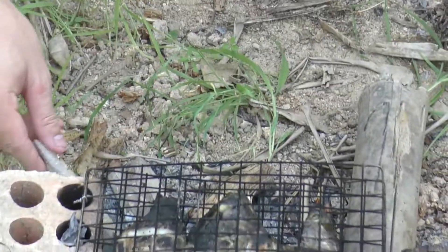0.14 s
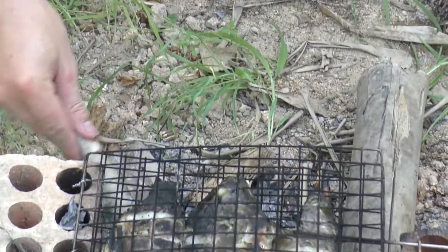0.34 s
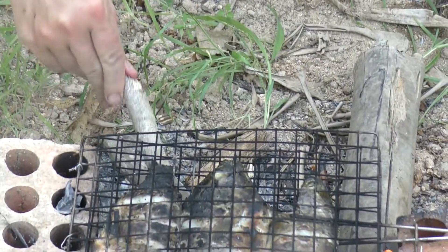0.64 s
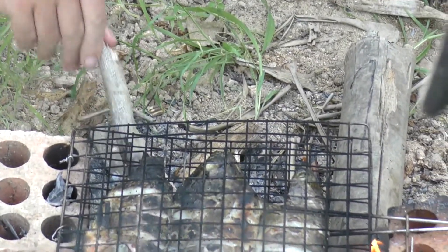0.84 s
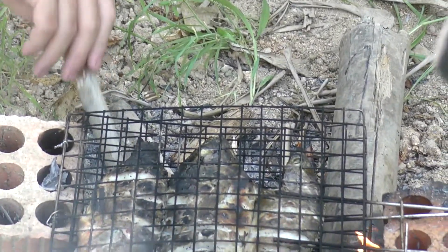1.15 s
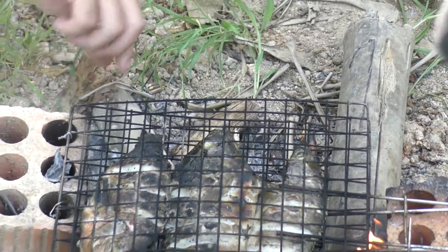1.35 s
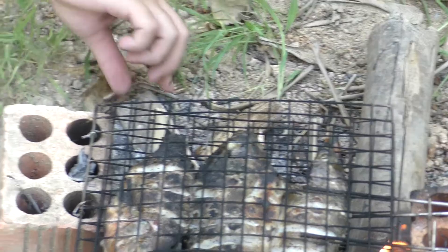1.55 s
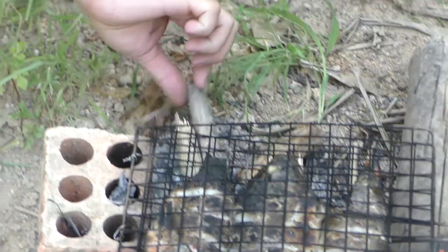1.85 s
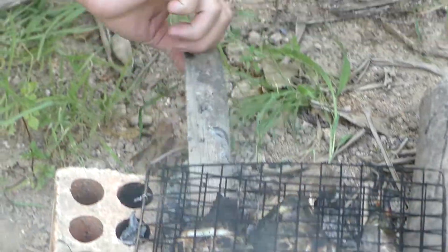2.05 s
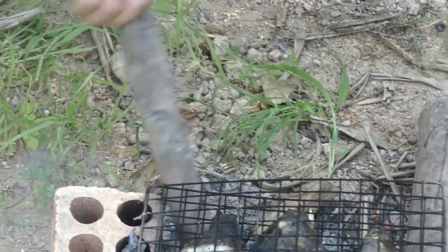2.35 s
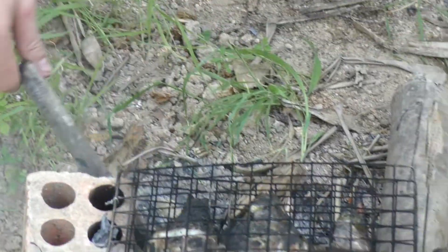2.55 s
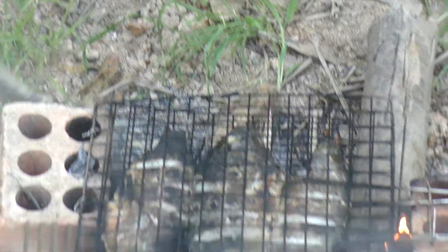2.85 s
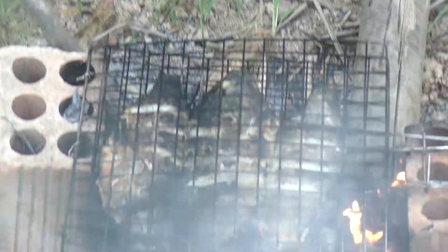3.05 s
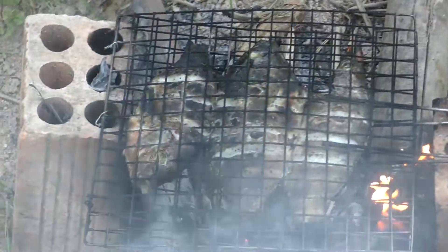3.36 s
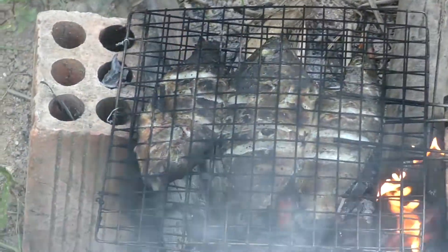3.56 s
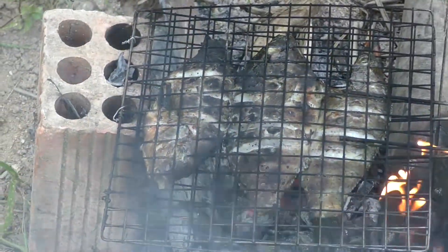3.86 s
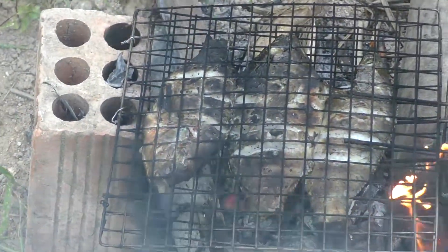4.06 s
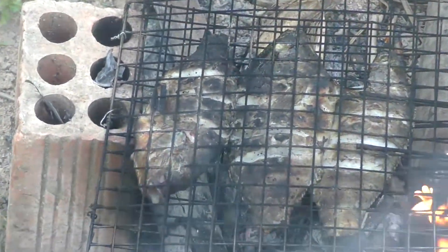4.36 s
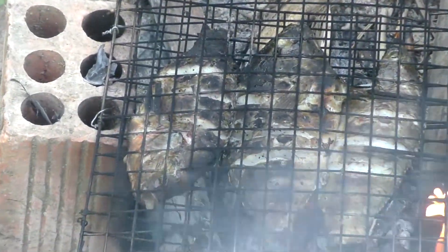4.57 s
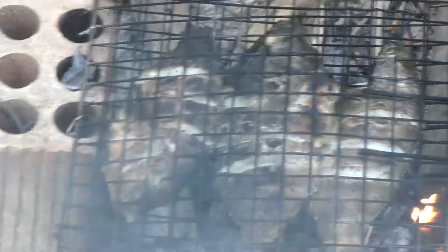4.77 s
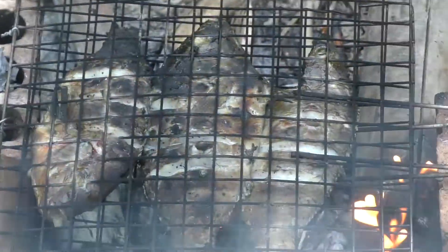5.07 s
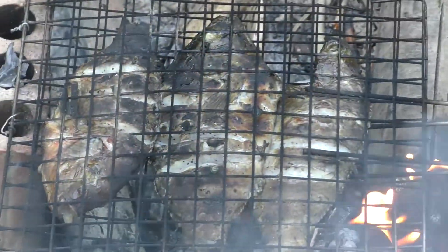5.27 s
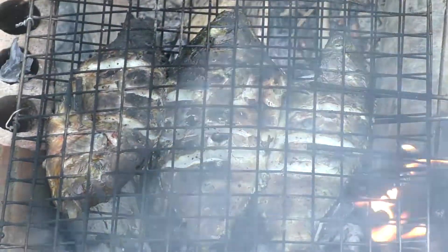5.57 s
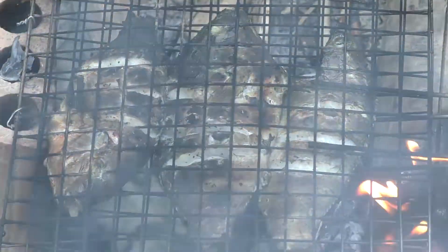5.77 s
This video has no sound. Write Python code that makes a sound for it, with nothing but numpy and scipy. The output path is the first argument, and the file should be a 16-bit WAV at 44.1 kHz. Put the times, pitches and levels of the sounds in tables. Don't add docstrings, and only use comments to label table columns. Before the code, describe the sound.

Outdoors beside a small wood fire, a near cicada buzzes shrilly, then stops at about two and a half seconds, uncovering another throbbing in quick phrases and a distant insect hiss. Sticks knock loudly, crackle and scrape through ash; the wire grill creaks faintly. Soft flames and a low far engine lie behind. Close stereo pair, turning toward the fire around two seconds.

```python
import sys
import numpy as np
from scipy import signal
from scipy.fft import rfft, irfft, next_fast_len
from scipy.io import wavfile
from scipy.ndimage import uniform_filter1d, map_coordinates

SR = 44100
rng = np.random.default_rng(int(sys.argv[2]) if len(sys.argv) > 2 else 0)


def to_linear_factor(level_db):
    exponent = np.asarray(level_db, float) / 20
    return 10 ** exponent


def wav_out(sig):
    wavfile.write(sys.argv[1], SR, np.round(np.clip(np.atleast_2d(sig).T, -1, 1) * 32767).astype(np.int16))


N = 260631
TIME = np.arange(N) / SR

# frequency in Hz, level in dB.
NEAR_BODY = [(3800, -26.5), (4400, -13.5), (4950, -11.5), (5150, -0.5), (5400, -1.5), (5790, -5),
             (6130, -0.5), (7350, -1.5), (7600, -2.5), (8100, -10.5), (8800, -12.5), (9200, -10.5),
             (12000, -21.5), (15700, -29)]
# frequency in Hz, width in Hz, level in dB.
NEAR_RINGS = [(5268, 30, 0), (5363, 30, 0), (5555, 35, 2), (5907, 40, 2), (6040, 35, 0), (6196, 35, 0),
              (6313, 35, 2), (6600, 60, 0), (6782, 45, 1), (6965, 35, 0), (7066, 35, 0), (7191, 35, 3),
              (7308, 40, 1), (7572, 30, 1), (7850, 40, 0), (7996, 25, 2), (8270, 35, 2), (8510, 45, 2),
              (8810, 50, 1)]
NEAR_DB, NEAR_TIRING_DB_PER_S, NEAR_BRIGHT_DB_PER_OCTAVE = -27, -0.48, 1
NEAR_STOP_S, NEAR_RELEASE_S = 2.555, 0.062

# frequency in Hz, width in Hz, level in dB.
THROB_BODY = [(4650, 250, -7.5), (5300, 300, -5), (5560, 300, -4), (5820, 230, 1.2), (6260, 200, -3.5),
              (6760, 260, -.5), (11300, 500, -12)]
FIRST_PHRASE_S, PHRASE_S, THROB_S, THROBS_PER_PHRASE = 0.1645, 0.3268, 0.0361, 7.4

# frequency in Hz, level in dB.
CHORUS_COLOUR = [(2500, -58), (3600, -18), (4900, -10), (5700, 1), (6220, 0.5), (6750, -4), (7300, -2.5),
                 (8660, -19), (9570, -20), (10300, -19), (11500, -18.5), (12300, -24.5), (13400, -32.5),
                 (15700, -44)]
# frequency in Hz, width in Hz, level in dB.
FAR_RINGS = [(8200, 120, -6), (9150, 150, -3), (10000, 120, -3), (10580, 250, 0), (11320, 150, 0),
             (11700, 150, 0), (12150, 150, -2), (12690, 120, -2)]
CHORUS_DB = -38

# time in seconds, peak in dB, own ring in Hz, share of the pile in dB.
CRACKS = [(1.0344, -19, 1377, -18), (1.3714, -19.5, 2340, -18), (2.162, -26, 2420, -8),
          (2.1872, -24, 1460, -2.5), (2.5264, -27.5, 1170, -10.5), (2.8098, -15.5, 1310, -2.5),
          (3.037, -24, 1720, -13), (3.1717, -27, 1030, -10.5), (3.2875, -17, 2800, -5),
          (3.3045, -12, 2050, -4.5), (3.3167, -17, 1400, -15), (3.7866, -19.5, 3000, -9.5),
          (3.897, -23.5, 1370, -1), (4.1923, -23.5, 2800, -5.5), (4.239, -19.5, 2210, 0.5),
          (4.2742, -23.5, 2970, -7), (4.332, -21, 2110, -9), (4.3413, -25, 2630, -4),
          (4.377, -32.5, 3040, 3), (5.6105, -20.5, 2290, -18), (5.662, -28, 2800, -5)]
# time in seconds, peak in dB, own ring in
# Hz.
FAINT_CRACKS = [(0.7735, -34.5, 2250), (0.8182, -30, 2250), (1.082, -31, 1500), (1.7347, -44, 2620),
                (1.99, -31, 1120), (2.038, -43, 3080), (2.1425, -29, 2370), (2.2256, -28, 1240),
                (2.6317, -29.5, 2000), (2.6972, -33, 1000), (2.8648, -28, 1310), (2.8962, -38, 2150),
                (3.218, -29, 2870), (3.407, -39, 1020), (3.44, -33, 1340), (3.496, -30, 2000),
                (3.7079, -32.5, 3100), (4.0597, -31, 1060), (4.1568, -27, 2720), (4.1757, -29, 1220),
                (4.9844, -38, 2650), (5.0652, -29, 1700), (5.2705, -32, 1240)]
# frequency in Hz, width in Hz, level in dB.
WOOD_PILE = [(326, 81, 1), (714, 280, -1), (1300, 110, 3.5), (1720, 220, 0.5), (2250, 240, 2),
             (3080, 136, 4.5), (3930, 300, -12.5), (4460, 460, -13.5)]
CRACK_T60_S, FAINT_CRACK_WOOD_DB, SNAP_DB = 0.031, -6.5, -22.5

# time in seconds, peak in dB.
KNOCKS = [(1.7412, -1.5), (2.0646, -11), (2.802, -13.5), (3.8751, -2), (4.9596, -8.5)]
# frequency in Hz, width in Hz, level in dB.
STICKS = [
    [(755, 67, 2), (1300, 95, -0.5), (1623, 69, 3.5), (2200, 98, 4), (3000, 150, -1.5), (4470, 540, -20)],
    [(490, 450, -6), (1710, 190, 2), (2370, 190, -6), (3190, 180, 5), (3700, 160, -2), (4230, 220, -6)],
    [(715, 170, -10), (1330, 160, -8), (2290, 230, -13), (2650, 97, 9), (2860, 250, 2.5), (4560, 270, -18)],
    [(696, 60, -4.5), (1280, 78, 0.5), (1740, 220, -5), (2230, 106, 4), (3040, 210, -9.5),
     (3940, 420, -16.5)],
    [(700, 40, -6), (1240, 28, 4.5), (1710, 61, -5), (2250, 106, -2), (3190, 190, -6.5)],
]
# time in seconds, peak in dB, pitch in Hz.
THUDS = [(0.471, -33, 213), (1.086, -31, 174), (1.74, -26.5, 277), (2.065, -34, 151), (2.22, -23.5, 151),
         (2.529, -32, 500), (2.808, -29, 198), (2.91, -19.5, 217), (3.309, -24, 326), (3.874, -25.5, 350),
         (4.237, -34, 480), (4.964, -26.5, 374)]

# time in seconds, level in dB.
SCRAPE_LEVEL = [(0.0, -41), (1.15, -70), (1.79, -59), (1.96, -50.5), (3.41, -37), (3.64, -47), (4.13, -39.5),
                (4.54, -41.5), (5.91, -42)]
# start and length in seconds, centre in Hz, width in octaves, level in dB.
SWISHES = [(0.369, 0.18, 2820, 0.53, -39), (0.05, 0.12, 2510, 0.66, -50), (1.746, 0.097, 2600, 0.86, -44.5),
           (2.058, 0.079, 2500, 1.7, -37), (2.121, 0.16, 2200, 1.6, -40.5), (2.798, 0.1, 2300, 0.55, -39),
           (3.116, 0.079, 3300, 0.42, -46.5), (3.304, 0.06, 3470, 1.04, -29),
           (3.865, 0.12, 1770, 0.66, -44), (4.027, 0.075, 1800, 0.92, -44.5),
           (4.235, 0.086, 2500, 1.4, -38), (4.313, 0.14, 2600, 1.3, -42), (4.743, 0.061, 2000, .8, -44),
           (4.956, 0.16, 1520, 1.7, -42), (5.585, 0.13, 2490, 1.3, -38.5), (5.704, 0.19, 1820, 1.1, -40)]
# start and length in seconds, slips per second, level in dB.
CREAKS = [
    (3.795, .09, 68, -35.5),
    (5.357, .12, 68, -44),
    (5.53, .05, 68, -45),
    (5.585, .1, 60, -42),
    (3.205, .035, 60, -41),
]

# frequency in Hz, level in dB.
AIR_COLOUR = [(18, -34), (30, -19), (59, -6), (80, -6), (164, -7.5), (224, -10.5), (371, -12), (498, -12.5),
              (1230, -23), (3500, -31.5), (4050, -45), (4500, -31), (5850, -72), (9900, -120)]
AIR_DB, TURN_S, TURN_LASTS_S, TURN_GAIN_DB = -41, 2.12, 0.23, 4
# time in seconds, level in dB.
ENGINE_HUM = [(0.1, -46), (0.23, -41.5), (0.63, -49), (0.66, -53), (1.16, -36.5), (1.33, -53.5),
              (1.73, -39), (2.09, -50), (2.33, -37), (3.14, -34), (3.65, -32.5), (5.69, -42), (5.87, -40),
              (5.9, -37)]
# frequency in Hz, level in dB, start and end in seconds.
ENGINE_ORDERS = [
    (80.5, -41, -1, 4.1),
    (90.5, -38, 2.1, 7),
]
# frequency in Hz, width in Hz, level in dB.
RUMBLE_BODY = [(105.7, 8.9, 1), (120.4, 13.2, 0.5), (134.8, 4.1, -2), (214, 13.5, -7.5)]
RUMBLE_DB, RUMBLE_FOLLOWS = -41.5, 0.56

# frequency in Hz, left-right likeness from 0 to 1.
LIKENESS = [(60, 0.67), (150, 0.32), (380, 0.62), (950, 0.39), (2380, 0.63), (5980, 0.88), (15000, 1)]
# frequency in Hz, left over right in dB.
BALANCE = [(60, -11), (150, -5), (380, -4), (950, -1.0), (2380, -0.5), (5980, 1.5), (15000, -10.5)]


def unit(x):
    return x / np.sqrt(np.mean(x ** 2) + 1e-20)


def along(points, hz):
    f, v = np.transpose(points)
    return np.interp(np.log(hz + 1), np.log(f + 1), v)


def level_curve(rows):
    s, db = np.transpose(rows)
    return np.interp(TIME, s, db)


def wobble(rate):
    knots = rng.standard_normal(int(N * rate / SR) + 4)
    return map_coordinates(knots, [TIME * rate])


def filtered(x, response):
    m = next_fast_len(N + SR // 4)
    hz = np.fft.rfftfreq(m, 1 / SR)
    return irfft(rfft(x, m) * response(hz), m)[..., :N]


def modes(table):
    def response(f):
        total = 0
        for k, (hz, width, db) in enumerate(table):
            total = total + (-1) ** k * to_linear_factor(db) * 1j * f * width / (hz * hz - f * f + 1j * f * width)
        return total
    return response


def clicks(rate, jitter, scatter_db):
    count = np.floor(np.cumsum(rate * (1 + jitter * wobble(300)) / SR))
    return np.diff(count, prepend=0) * to_linear_factor(scatter_db * rng.standard_normal(N))


def rush(patchy_db):
    z = signal.stft(rng.standard_normal((2, N + 512)), nperseg=512)[2]
    patches = uniform_filter1d(rng.standard_normal(z.shape[1:]), size=6, axis=0)
    patches = uniform_filter1d(patches, size=12, axis=1)
    return signal.istft(z * to_linear_factor(patchy_db * unit(patches)), nperseg=512)[1][:, :N]


def foliage(x, t60, wet_db):
    t = np.arange(SR // 8) / SR
    tail = rng.standard_normal((2, 2, len(t))) * to_linear_factor(-60 * t / t60)
    tail = tail / np.linalg.norm(tail[0, 0])
    wet = signal.fftconvolve(x[None, None], tail, axes=2)[..., :N]
    sway = 1.22 * TIME
    scattered = np.cos(sway) * wet[0] + np.sin(sway) * wet[1]
    return to_linear_factor(wet_db) * scattered + x * np.array([[1], [0]])


def near_cicada():
    level_db = NEAR_DB + NEAR_TIRING_DB_PER_S * TIME
    bright_db = NEAR_BRIGHT_DB_PER_OCTAVE + 0.77 * wobble(8.9)
    buckles = clicks(312, jitter=0.25, scatter_db=4.5) + clicks(358, jitter=0.25, scatter_db=0)
    buckles += 0.13 * rng.standard_normal(N)
    rings = modes(NEAR_RINGS)
    buzz = filtered(buckles, lambda f: to_linear_factor(along(NEAR_BODY, f)) * (0.3 + np.abs(rings(f))))
    buzz = unit(foliage(buzz, t60=0.45, wet_db=-0.5))
    tilt = filtered(buzz, lambda f: np.log2((f + 1) / 6500) / 10.0)
    song = np.clip((NEAR_STOP_S - TIME) / NEAR_RELEASE_S, 0, 1)
    return song * to_linear_factor(level_db + 0.8 * wobble(18)) * (buzz + bright_db * tilt)


def throbbing_cicada():
    effort = np.zeros(N)
    for start in np.arange(FIRST_PHRASE_S, N / SR, PHRASE_S):
        throb = (TIME - start + 0.0071) / THROB_S
        swell = np.sin(np.pi * np.clip(throb % 1 / 0.72, 0, 1) ** 0.7)
        fill = 0.14 + 0.8 * np.clip(throb / THROBS_PER_PHRASE, 0, 1) ** 2
        phrase = (throb > 0) * np.clip((THROBS_PER_PHRASE - throb) / 1.2, 0, 1)
        effort += phrase * (fill + (1 - fill) * swell)
    groups = 1 + 0.35 * np.sin(2 * np.pi * 104 * TIME)
    ribs = clicks(420, jitter=0.03, scatter_db=1.2) * groups + 0.093 * rng.standard_normal(N)
    ring = unit(filtered(ribs, lambda f: modes(THROB_BODY)(f) ** 2))
    return to_linear_factor(-34) * foliage(effort * ring, t60=0.04, wet_db=-10)


def fire():
    own, blows, snaps = np.zeros((3, N + SR))
    t = np.arange(SR // 10) / SR
    events = CRACKS + [(*tick, FAINT_CRACK_WOOD_DB) for tick in FAINT_CRACKS]
    noise = rng.standard_normal((len(events), 3, len(t)))
    fade_db = -60 * t / CRACK_T60_S
    blow_fade = to_linear_factor(-60 * t / (0.17 * CRACK_T60_S)) + 0.12 * to_linear_factor(-60 * t / 0.11)
    for (s, db, hz, wood_db), (burst, snap, shake) in zip(events, noise):
        here = slice(round(s * SR), round(s * SR) + len(t))
        ring = np.sin(2 * np.pi * hz * t + 0.024 * np.cumsum(shake)) * (1 - np.exp(-t / 0.00047))
        own[here] += to_linear_factor(db - 6 + fade_db) * ring
        blows[here] += to_linear_factor(db + wood_db) * burst * blow_fade
        snaps[here] += to_linear_factor(db + SNAP_DB + fade_db) * snap
    snaps = filtered(snaps[:N], modes([(4800, 1200, 21.5), (9250, 6300, 6.9)]))
    wood = own[:N] + to_linear_factor(16.0) * filtered(blows[:N], modes(WOOD_PILE))
    wood = signal.sosfilt(signal.butter(4, 4300, fs=SR, output="sos"), wood)
    return foliage(wood + snaps, t60=0.072, wet_db=-5.5)


def knocks():
    out = np.zeros(N)
    for (s, db), stick in zip(KNOCKS, STICKS):
        blow = np.zeros(N)
        blow[round(s * SR)] = 1
        blow[round((s + 0.0021) * SR)] = 0.35
        ring = filtered(np.convolve(blow, np.hanning(8))[:N], modes(stick))
        out += to_linear_factor(db) * ring / np.abs(ring).max()
    return foliage(out, t60=0.026, wet_db=-6)


def thuds():
    out, t = np.zeros(N + SR), np.arange(SR // 10) / SR
    for s, db, hz in THUDS:
        push = to_linear_factor(db + 2.0 - 60 * t / 0.041) * np.sin(2 * np.pi * hz * t)
        out[round(s * SR):][:len(t)] += push
    return out[:N] * np.array([[1], [0.3]])


def hump(hz, octaves):
    return lambda f: to_linear_factor(-6 * (np.log2((f + 1) / hz) / octaves) ** 2)


def scraping():
    grains = (rng.random((2, N)) < 3000 / SR) * rng.standard_normal((2, N)) * to_linear_factor(5.3 * wobble(60))
    ash = rng.standard_normal((2, N)) * to_linear_factor(1.2 * wobble(120))
    out = to_linear_factor(level_curve(SCRAPE_LEVEL) - 8.5) * unit(filtered(grains, hump(1590, 1.0)))
    for s, length, hz, octaves, db in SWISHES:
        sharpness = np.clip(4 * length, 0.2, 0.8)
        stroke = np.sin(np.pi * np.clip((TIME - s) / length, 0, 1) ** sharpness)
        out += to_linear_factor(db) * stroke * unit(filtered(ash, hump(hz, octaves)))
    return out


def wire_creaks():
    slips, uneven = np.zeros(N), wobble(40)
    for s, length, rate, db in CREAKS:
        fade = (TIME > s) * np.clip(1 - (TIME - s) / length, 0, 1) ** 0.49
        slip = 0.33 + np.sin(np.pi * rate * (TIME - s) + 0.88 * uneven) ** 2
        slips += to_linear_factor(db + 3.1 * uneven) * fade * slip
    wire = filtered(rng.standard_normal((2, N)), lambda f: modes([(3010, 310, 0)])(f) ** 2)
    return slips * unit(wire)


def far_chorus():
    singers = modes(FAR_RINGS)
    hiss = filtered(rush(patchy_db=0.7), lambda f: to_linear_factor(along(CHORUS_COLOUR, f)) * (0.8 + np.abs(singers(f))))
    return to_linear_factor(CHORUS_DB + 0.28 * wobble(3.1)) * unit(hiss)


def flames_and_traffic():
    turn_db = TURN_GAIN_DB / (1 + np.exp((TURN_S - TIME) / TURN_LASTS_S))
    air = unit(filtered(rush(patchy_db=2.14), lambda f: to_linear_factor(along(AIR_COLOUR, f))))
    return to_linear_factor(AIR_DB + turn_db + 1.2 * wobble(8)) * air


def far_engine():
    hum_db = level_curve(ENGINE_HUM)
    tones = to_linear_factor(hum_db + 1.6) * np.sin(2 * np.pi * 60.3 * TIME + 0.5 * wobble(3.8))
    for hz, db, start, end in ENGINE_ORDERS:
        heard = np.clip(np.minimum(TIME - start, end - TIME) / 0.71, 0, 1)
        phase = 2 * np.pi * np.cumsum(hz + 1.35 * wobble(7)) / SR
        tones += heard * to_linear_factor(db + 1.9 * wobble(4.12)) * np.sin(phase)
    swing_db = uniform_filter1d(hum_db - hum_db.mean(), size=SR // 2)
    body = modes(RUMBLE_BODY)
    rumble = unit(filtered(rng.standard_normal((2, N)), lambda f: body(f) * (f / (f + 60)) ** 2))
    rumble = to_linear_factor(RUMBLE_DB + RUMBLE_FOLLOWS * swing_db) * rumble
    return np.sqrt(2) * tones * np.array([[1], [0.3]]) + rumble


def microphone_pair(pair):
    def mid_side(hz):
        angle = np.arccos(np.clip(along(LIKENESS, hz), -1, 1)) / 2
        return np.array([np.cos(angle), np.sin(angle)])
    mid, side = filtered(pair, mid_side)
    left_right = np.array([mid + side, mid - side])
    return filtered(left_right, lambda hz: to_linear_factor(np.outer([0.5, -0.5], along(BALANCE, hz))))


def scene():
    insects = near_cicada() + throbbing_cicada() + far_chorus()
    fireside = fire() + knocks() + thuds() + scraping() + wire_creaks()
    distance = flames_and_traffic() + far_engine()
    return microphone_pair(insects + fireside + distance)


def top_cut(x):
    return signal.sosfilt(signal.butter(12, 15740, fs=SR, output="sos"), x)


def record(dry):
    return top_cut(dry)


dry = scene()
out = record(dry)
wav_out(out)
```